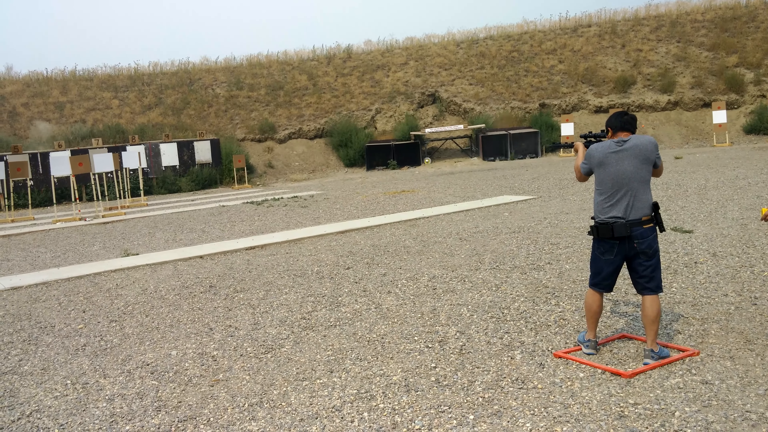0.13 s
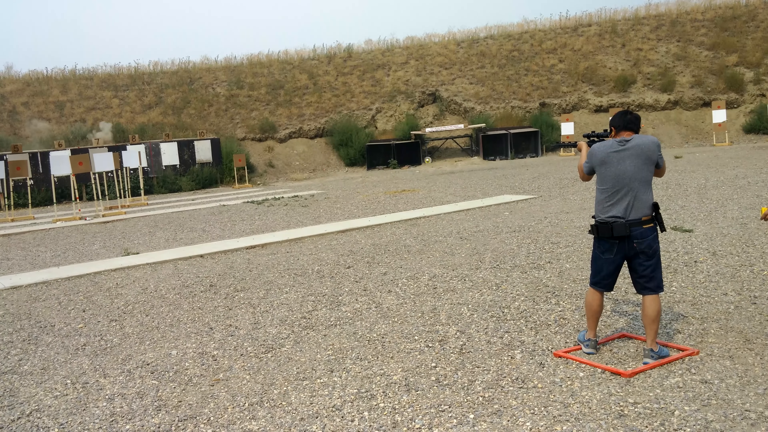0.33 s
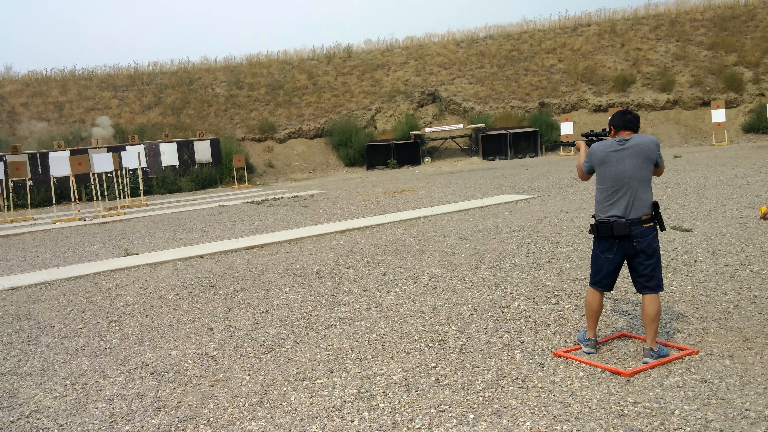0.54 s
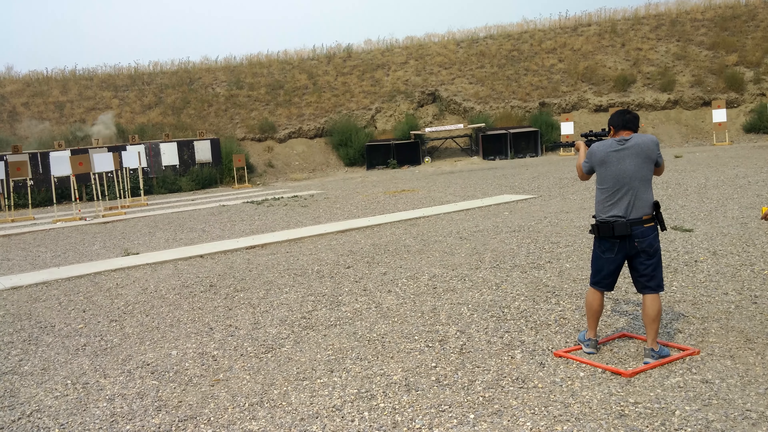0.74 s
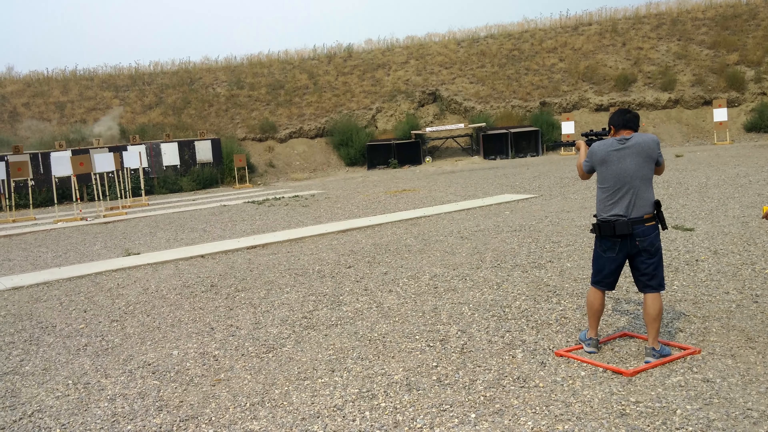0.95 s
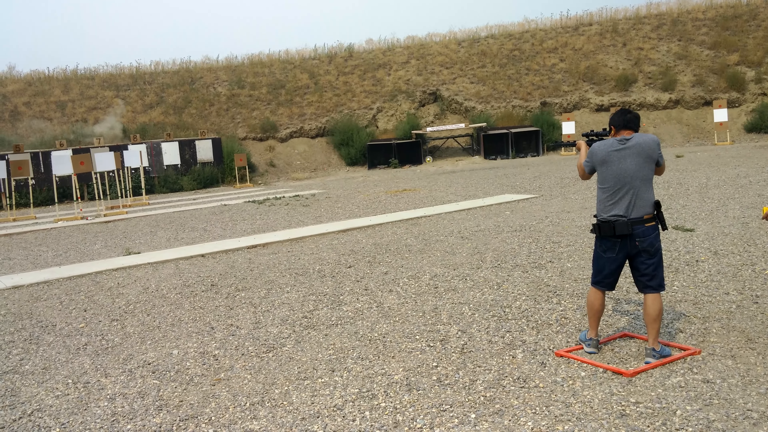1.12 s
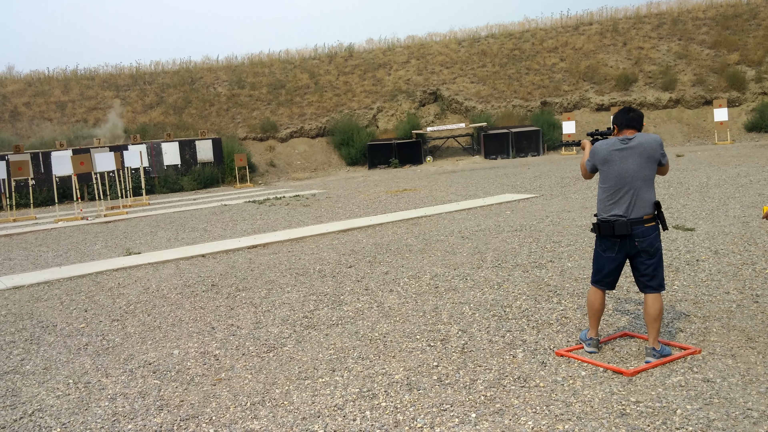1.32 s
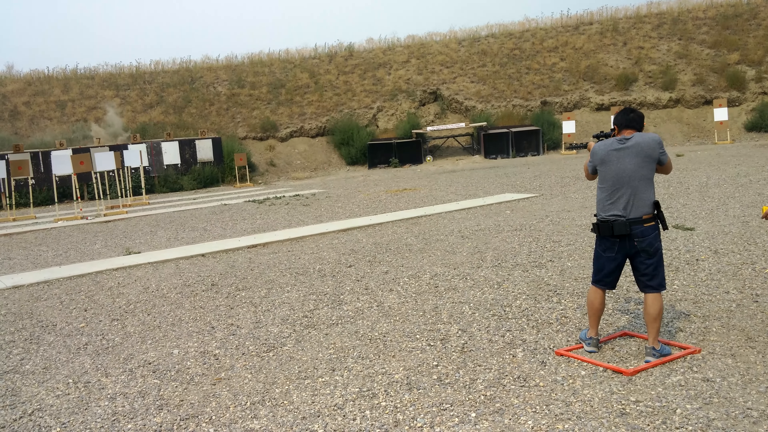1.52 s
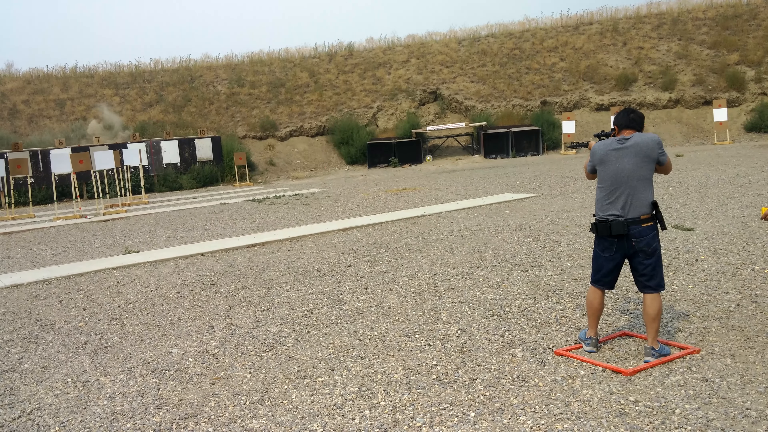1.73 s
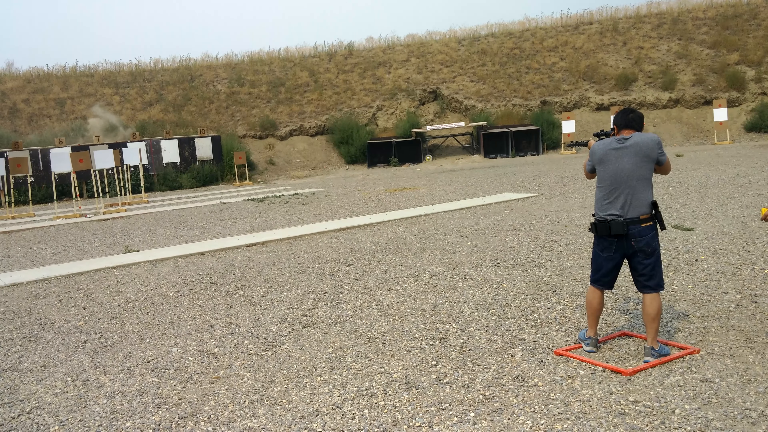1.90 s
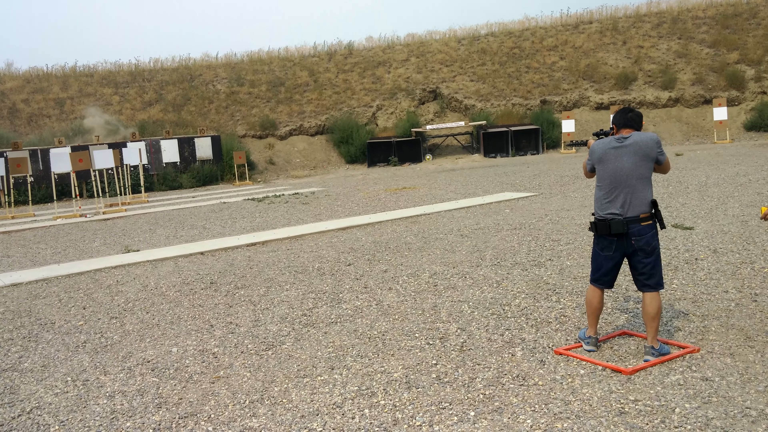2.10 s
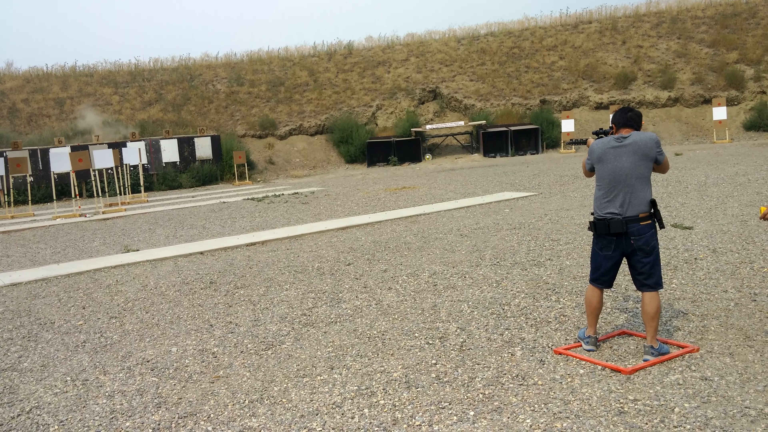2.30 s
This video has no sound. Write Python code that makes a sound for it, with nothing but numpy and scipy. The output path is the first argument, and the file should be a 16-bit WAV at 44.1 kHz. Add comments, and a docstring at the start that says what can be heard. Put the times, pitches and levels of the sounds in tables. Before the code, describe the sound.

Two rifle shots on an outdoor gravel range, heard a few metres away through an overloaded small microphone. Low wind rumble leads to a harsh, flattened crack at 0.24 s, with rapid slaps, gritty scatter and dull bank booms for about 0.2 s, then a darkening roll. A second, slightly weaker shot at 1.3 s has a drier echo. Barely audible case ticks come near 0.96 and 2.05 s; soft wind bumps after 2.2 s.

```python
"""Two rifle shots crack over an open gravel range, overloading a small microphone a few metres away.
Each muzzle blast is decaying noise with pressure pushes. Shaped noise makes the scatter off the gravel,
the slaps from targets and barriers, the booms off the earth banks and the roll that dies away.
Spent cases tick faintly on the ground as short noise bursts, and wind rumbles as slowly varying noise."""
import sys
import numpy as np
from scipy import signal
from scipy.fft import rfft, irfft, next_fast_len
from scipy.io import wavfile
from scipy.ndimage import uniform_filter1d, minimum_filter1d, map_coordinates

SR = 44100
rng = np.random.default_rng(int(sys.argv[2]) if len(sys.argv) > 2 else 0)


def dump(signal):
    """Clip the signal to [-1, 1] and save it as 16-bit WAV at the path in sys.argv[1]."""
    limited = np.clip(np.atleast_2d(signal).T, -1, 1)
    pcm = np.round(limited * 32767).astype(np.int16)
    wavfile.write(sys.argv[1], SR, pcm)


N = 103635

# Spectrum of the sharp blast and its slaps: frequency_hz, density_db (relative, per Hz)
CRACK_SPECTRUM = [(100, -9.5), (500, 4), (1500, 0), (2700, -2), (4000, 2), (5200, -6), (6500, -19.5),
                  (9000, -31.5), (16000, -44.5)]


def amp(db):
    """Level law: twenty decibels are a factor of ten in amplitude."""
    return 10 ** (np.asarray(db) / 20)


def unit(x):
    """Normalisation: division by the root mean square gives a signal of rms 1."""
    return x / np.sqrt(np.mean(x ** 2) + 1e-20)


def along(points, hz):
    """Interpolation of (frequency_hz, value) points along a logarithmic frequency axis."""
    frequency_hz, value = np.transpose(points)
    return np.interp(np.log(hz + 1), np.log(frequency_hz + 1), value)


def filtered(x, response):
    """Linear filtering: the spectrum is multiplied by a response of frequency."""
    size = next_fast_len(N + SR // 2)  # padded against wrap-around
    spectrum = rfft(x, size) * response(np.fft.rfftfreq(size, 1 / SR))
    return irfft(spectrum, size)[:N]


def noise(spectrum):
    """Coloured noise: white noise shaped by a spectral density, at rms 1."""
    white = rng.standard_normal(N)
    return unit(filtered(white, lambda hz: amp(along(spectrum, hz))))


def wobble(knots_per_s):
    """Slow random modulation: a smooth curve through random knots."""
    knots = rng.standard_normal(N)
    return map_coordinates(knots, [np.arange(N) * knots_per_s / SR], mode="mirror")


def delayed(x, delay_s):
    """Propagation delay: the signal starts later and is otherwise unchanged."""
    return np.pad(x, (max(round(delay_s * SR), 0), 0))[:N]


def burst(spectrum, t60_s):
    """Exponential decay: noise starts at once and falls 60 dB in t60_s."""
    return noise(spectrum) * amp(-60 * np.arange(N) / SR / t60_s)


def rifle():
    """Superposition: each shot sums a blast, partly repeatable echoes and a diffuse roll."""
    # The shots: start_s, blast_db, echo_db, roll_db
    shots = [(0.2382, 20, 2, -0.5), (1.299, 14.5, -5.5, -7)]
    blast_t60_s = 0.06
    alike = 0.61  # share of echo power common to both shots
    common = echoes()
    out = np.zeros(N)
    for start_s, blast_db, echo_db, roll_db in shots:
        answer = np.sqrt(alike) * common + np.sqrt(1 - alike) * echoes()
        blast = amp(blast_db) * burst(CRACK_SPECTRUM, blast_t60_s) + pushes()
        shot = blast + amp(echo_db) * answer + amp(roll_db) * roll()
        out += delayed(shot, start_s)
    return out


def pushes():
    """Blast-wave pressure: a quick compression, then a slower suction."""
    # Waves from the muzzle, a near barrier and the bank: delay_s, level_db, compression_s
    waves = [(.007, 0.5, 0.0084), (0.05, 5.5, 0.0033), (0.128, -1, .006)]
    rise_s = 0.0017
    t = np.arange(N) / SR
    rise = 1 - np.exp(-(t / rise_s) ** 2)
    out = np.zeros(N)
    for delay_s, level_db, compression_s in waves:
        wave = rise * (1 - t / compression_s) * np.exp(-t / compression_s)
        out += delayed(amp(level_db) * wave, delay_s)
    return out


def echoes():
    """Superposition of the reflections from the range."""
    return gravel_scatter() + ground_body() + hollow_note() + bank_booms() + slaps()


def slaps():
    """Specular reflection: hard surfaces return short copies in the blast's colour."""
    # Hard surfaces down range: delay_s, level_db
    surfaces = [(.019, 3), (.038, 6.5), (.059, 10), (.080, 5), (.102, 8), (.118, 5.5), (.136, 5),
                (.182, -0.5)]
    rise_s, t60_s = 0.0028, 0.025
    rise = 1 - np.exp(-(np.arange(N) / SR / rise_s) ** 2)
    out = np.zeros(N)
    for delay_s, level_db in surfaces:
        out += delayed(amp(level_db) * rise * burst(CRACK_SPECTRUM, t60_s), delay_s)
    return out


def ground_decay_db():
    """Two-slope decay: ground scatter sags gently, then dies quickly."""
    sag_db_per_s, hold_s, t60_s = 31.5, 0.13, 0.11  # t60 of the added later decay
    t = np.arange(N) / SR
    return -sag_db_per_s * t - 60 * np.maximum(t - hold_s, 0) / t60_s


def gravel_scatter():
    """Diffuse scattering: the gravel returns bright, grainy noise."""
    # Spectrum of the bright scatter: frequency_hz, density_db (relative, per Hz)
    spectrum = [(200, -20.5), (700, -9), (1400, 1.5), (1900, 0), (2800, -3), (4000, 3), (5000, -4),
                (6300, -17.5), (9000, -34), (16000, -61.5)]
    level_db, grain_db = -6.5, 4
    return noise(spectrum) * amp(level_db + ground_decay_db() + grain_db * wobble(240))


def ground_body():
    """Diffuse build-up: a lower, lumpy part of the ground scatter grows before it dies."""
    # Spectrum of the lower scatter: frequency_hz, density_db (relative, per Hz)
    spectrum = [(30, -20.5), (100, -5), (220, 3.5), (400, -7.5), (600, 1), (850, 4.5), (1300, -7.5),
                (2500, -27.5), (6000, -60)]
    level_db, lump_db, rise_s = -6, 2, 0.035
    rise = np.minimum(np.arange(N) / SR / rise_s, 1)
    return noise(spectrum) * rise * amp(level_db + ground_decay_db() + lump_db * wobble(110))


def hollow_note():
    """Resonance: a narrow band of noise swells and fades as a hollow note in the echo."""
    centre_hz, half_gain_offset_hz = 1100, 110
    peak_s, spread_s, level_db = 0.082, 0.022, -5.5
    white = rng.standard_normal(N)
    note = unit(filtered(white, lambda hz: 1 / (1 + ((hz - centre_hz) / half_gain_offset_hz) ** 2)))
    swell = np.exp(-((np.arange(N) / SR - peak_s) / spread_s) ** 2)
    return note * amp(level_db) * swell


def bank_booms():
    """Extended reflection: dull noise from each earth bank swells to a peak, then decays."""
    # Near and far bank: peak_s, level_db
    banks = [(0.164, -2), (0.347, -31.5)]
    # Spectrum of the booms: frequency_hz, density_db (relative, per Hz)
    spectrum = [(30, -25), (80, -11.5), (140, 1.5), (260, 3), (420, -1), (660, -4), (850, -18), (1200, -18),
                (2500, -32), (6000, -69)]
    rise_db_per_s, t60_s = 37.5, 0.24
    t = np.arange(N) / SR
    out = np.zeros(N)
    for peak_s, level_db in banks:
        swell_db = np.minimum(rise_db_per_s * (t - peak_s), 60 * (peak_s - t) / t60_s)
        out += noise(spectrum) * amp(level_db + swell_db)
    return out


def roll():
    """Frequency-dependent decay: far scatter builds up and dies away, the bass last."""
    # Spectrum of the roll: frequency_hz, density_db (relative, per Hz)
    spectrum = [(30, -20), (70, -3), (250, 6.5), (500, 3.5), (900, -4.5), (2000, -8), (3000, -8.5),
                (4300, -6.5), (5200, -14), (6500, -28.5), (9000, -44.5), (16000, -75)]
    # Decay time of the roll: frequency_hz, t60_s
    decay = [(60, 1.05), (200, 0.78), (500, 0.48), (1000, 0.49), (2000, 0.49), (4500, 0.48), (9000, 0.28)]
    level_db, build_s = -12, 0.18
    hz, t, bands = signal.stft(noise(spectrum), SR, nperseg=512)
    fade = amp(-60 * np.maximum(t - build_s, 0) / along(decay, hz)[:, None])
    build = np.minimum(t / build_s, 1)
    tail = signal.istft(bands * fade * build, SR, nperseg=512)[1][:N]
    return tail * amp(level_db + 1.1 * wobble(45))


def cases():
    """Impact excitation: spent cases landing on the gravel give short, damped ticks."""
    # Landings: start_s, level_db
    landings = [(.964, -57), (2.0501, -64.5)]
    # Spectrum of a tick: frequency_hz, density_db (relative, per Hz)
    spectrum = [(500, -25), (2000, -23), (3500, 13), (5000, -6), (7000, -26), (14000, -39)]
    t60_s = 0.017
    return sum(delayed(amp(level_db) * burst(spectrum, t60_s), start_s) for start_s, level_db in landings)


def wind():
    """Turbulent pressure: gusts buffet the microphone over a faint steady hiss."""
    # Three successive stretches of gusts: time_s, rumble_db, flutter_db
    gusts = [
        [(0.0, -27.5, -37.5), (0.098, -29, -39), (0.108, -26.5, -31.5), (0.176, -25, -36), (0.22, -27.5, -33.5)],
        [(0.75, -39.5, -52), (0.968, -51.5, -64.5), (0.996, -45.5, -59), (1.064, -59.5, -68),
         (1.22, -53.5, -77)],
        [(1.88, -70, -72.5), (2.138, -62, -84.5), (2.232, -29.5, -49.5), (2.3, -36.5, -60),
         (2.33, -33.5, -45.5)],
    ]
    # Spectra of rumble, flutter and hiss: frequency_hz, density_db (relative, per Hz)
    rumble_spectrum = [(15, -36), (30, -22), (70, 3.5), (120, -0.5), (200, -6), (290, -13.5), (450, -32.5),
                       (1000, -74.5)]
    flutter_spectrum = [(150, -33.5), (300, 0.5), (400, -5.5), (600, -10.5), (900, -22.5), (1500, -40),
                        (3000, -52), (8000, -59.5)]
    hiss_spectrum = [(100, 1), (500, -9), (1500, -15), (5000, -21.5), (9000, -24), (16000, -26)]
    hiss_db = -70.5
    time_s, *levels = np.transpose(np.vstack(gusts))
    rumble_db, flutter_db = [np.interp(np.arange(N) / SR, time_s, level) for level in levels]
    lumps_db = 1.5 * wobble(23)
    rumble = noise(rumble_spectrum) * amp(rumble_db + lumps_db)
    flutter = noise(flutter_spectrum) * amp(flutter_db + lumps_db)
    return rumble + flutter + amp(hiss_db) * noise(hiss_spectrum)


def scene():
    """Superposition: all sound pressures add at the one microphone."""
    return (rifle() + cases() + wind())[None]


def record(dry):
    """Saturation: the microphone overloads, a very fast limiter flattens peaks, a filter cuts the top."""
    # Treble colour: frequency_hz, gain_db
    treble = [(7000, -0.5), (11000, -2), (15000, -4.5)]
    overload_top = 3.6
    limit_top, limit_hold_s = 0.81, 0.0007  # limit in amplitude, ahead of the filter
    top_hz, top_steepness = 15800, 70
    overloaded = overload_top * np.tanh(dry[0] / overload_top)
    size = round(limit_hold_s * SR)
    needed = limit_top / np.maximum(np.abs(overloaded), limit_top)
    # The centred windows lower the gain just ahead of each peak
    gain = uniform_filter1d(minimum_filter1d(needed, size), size)

    def response(hz):
        """Low-pass filtering: the treble colour ends in a steep band limit."""
        return amp(along(treble, hz)) / (1 + (hz / top_hz) ** top_steepness)

    return filtered(overloaded * gain, response)[None]


dry = scene()
out = record(dry)
dump(out)
```